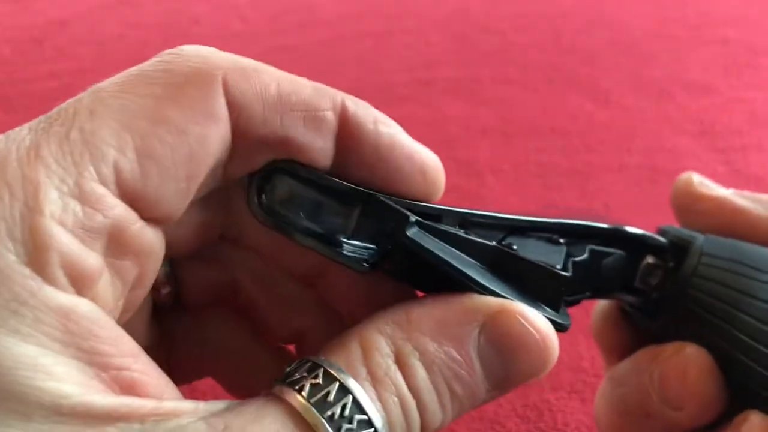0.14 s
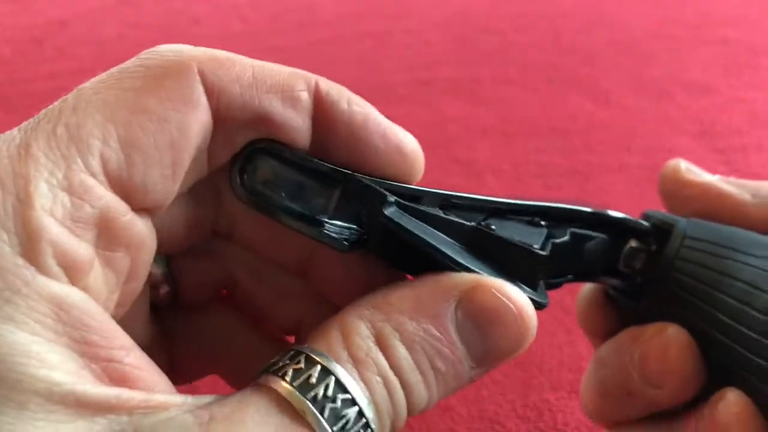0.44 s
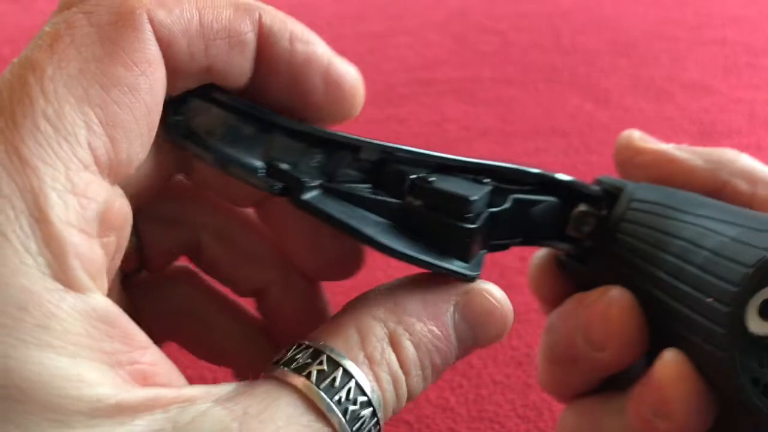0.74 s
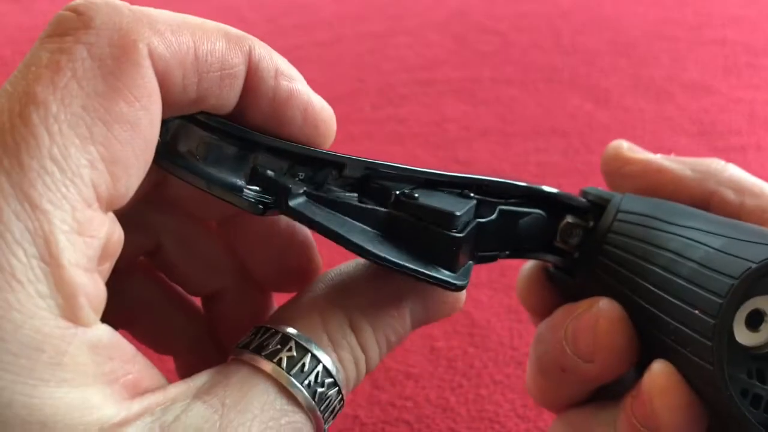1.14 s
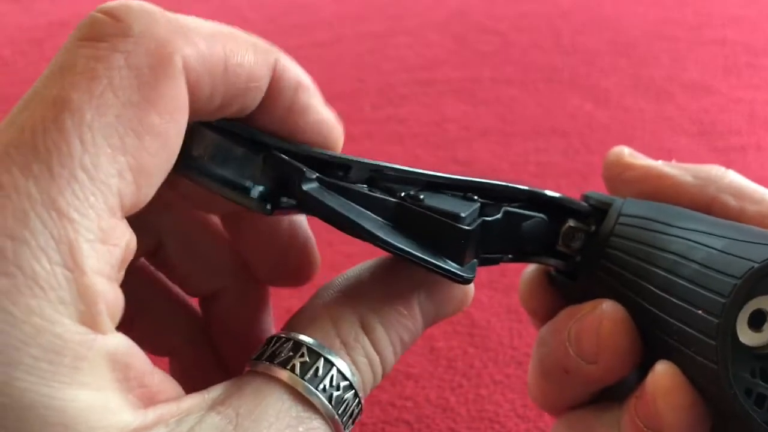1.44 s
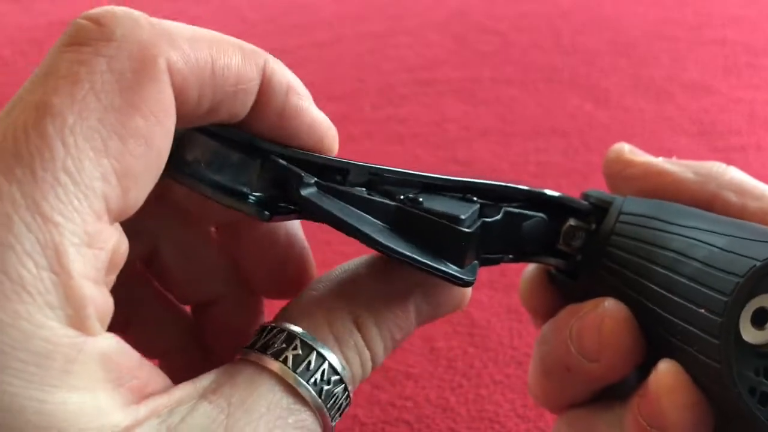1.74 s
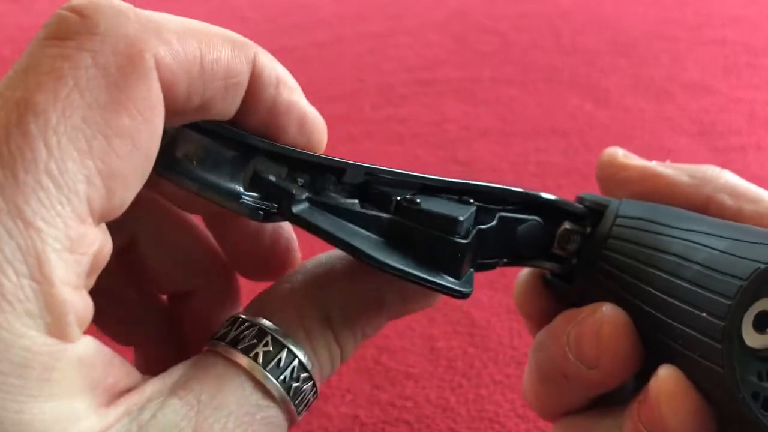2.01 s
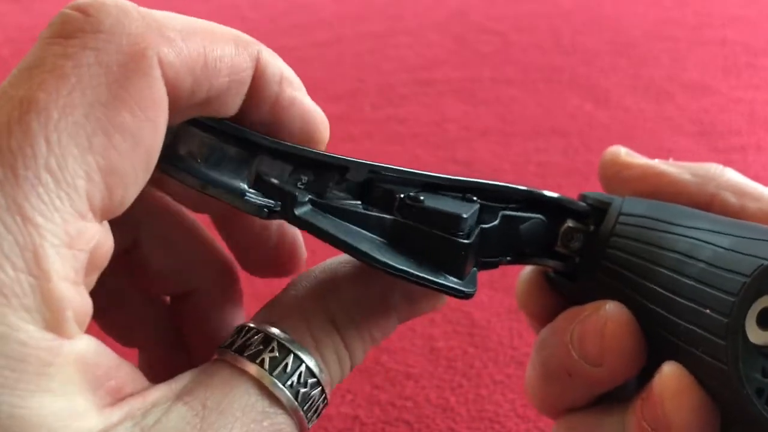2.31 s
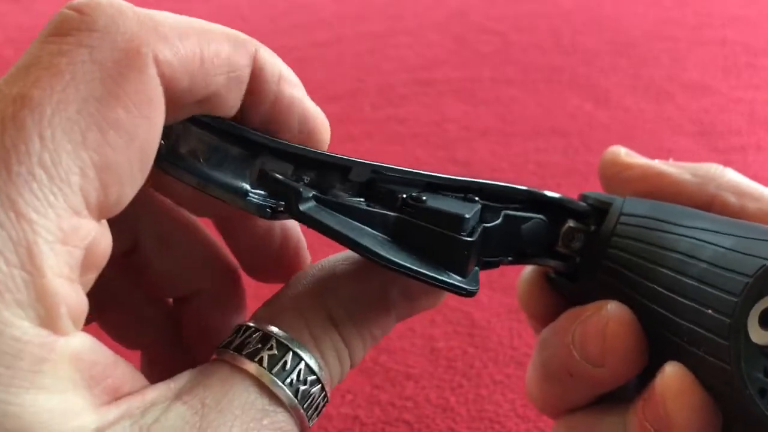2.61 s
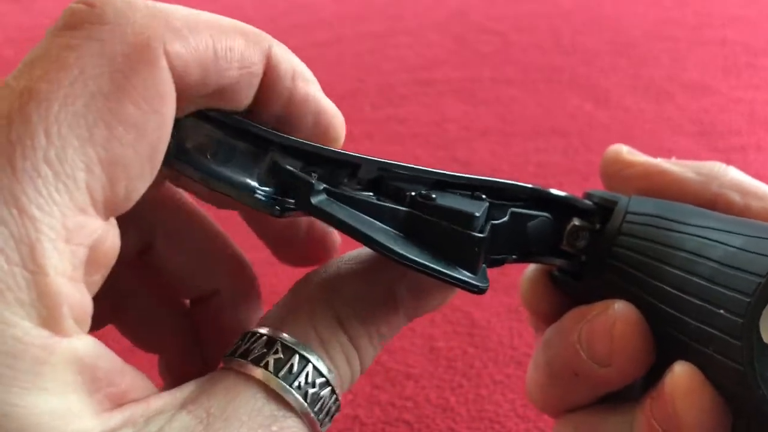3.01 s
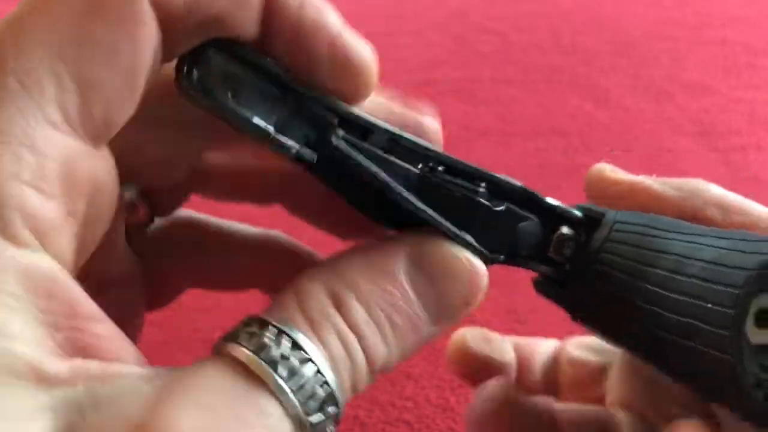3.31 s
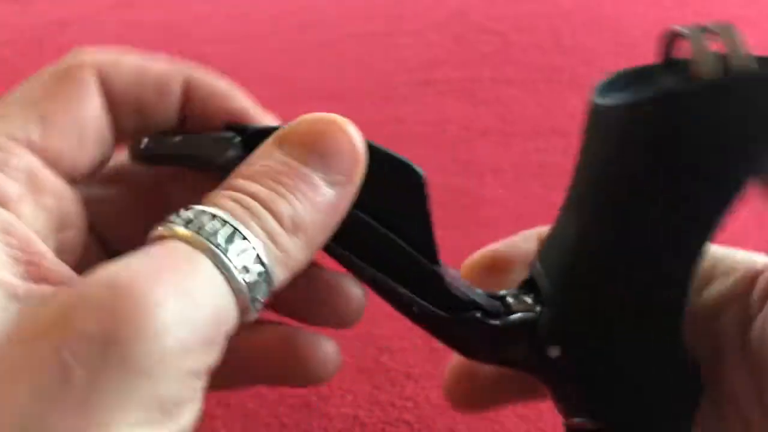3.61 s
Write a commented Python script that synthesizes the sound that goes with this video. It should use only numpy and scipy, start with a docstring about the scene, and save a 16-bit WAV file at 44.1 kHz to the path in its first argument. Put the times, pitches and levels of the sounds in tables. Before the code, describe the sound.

Hard, bright, very short plastic switch clicks, close and dry. The first button snaps down and back twice at 0.19, 0.33, 0.47 and 0.58 s; faint finger rubbing follows. The second clicks ten times from 1.36 to 2.94 s, about every 0.15 s, with a longer gap near 2 s. Around 3.45-3.57 s loose hinge parts clatter with a low soft boom. Quiet room, faint hiss and rumble.

```python
"""Two electronic shift buttons on a hand-held bicycle brake lever are pressed and let go, close by in a quiet room.
Each switch snaps once going down and once coming back: damped modes ring the plastic lever and thump the hand.
Loose hinge parts knock (noise bursts and modes), mostly as the lever is turned over with a low boom at the end.
Fingers tap the paddle (soft-started modes) and slide over the housing (resonant and grainy noise).
Decaying noise and reflections form the room; hiss, rumble, a drone and a hum lie beneath."""
import sys
import numpy as np
from scipy import signal
from scipy.fft import rfft, irfft
from scipy.io import wavfile
from scipy.ndimage import uniform_filter1d, minimum_filter1d

SR = 44100
rng = np.random.default_rng(int(sys.argv[2]) if len(sys.argv) > 2 else 0)


def inscribe(sig):
    """Save sig as 16-bit PCM at rate SR to the path in sys.argv[1].

    A 1-D sig is mono; a 2-D sig holds one channel per row.
    Samples are clipped to [-1, 1] before scaling.
    """
    pcm = np.round(np.clip(np.atleast_2d(sig).T, -1, 1) * 32767)
    wavfile.write(sys.argv[1], SR, pcm.astype(np.int16))


N = 165375
T = np.arange(N) / SR
HIT_T = T[:SR // 8]  # time axis of one struck sound
TILT_PIVOT_HZ = 5500  # a mode here keeps its level under any tilt

# Modes of the lever: f/Hz, T60/s, then relative level/dB for button 1 down, 1 up, 2 down, 2 up
LEVER_MODES = [(1825, 0.011, -60, -28.5, -43.5, -32), (2809, 0.001, -49, -51.5, -80, -54),
               (3356, 0.0086, -34.5, -17, -38.5, -18.5), (4430, 0.0061, -21.5, -6.5, -27, -11.5),
               (5110, 0.0024, -18.5, -23, -28, -10.5), (5750, 0.0095, -28, -22, -26.2, -24.5),
               (6580, 0.0018, -10.6, -32.5, -15, -14), (8440, 0.0026, -17, -28.5, -6, -60),
               (9810, 0.0067, -12.5, -21, -20, -82), (10860, 0.0053, -11.5, -20.5, -36, -42),
               (11960, 0.0045, -16.8, -47, -12, -24.5), (13170, 0.0062, -19, -47, -12.5, -25),
               (13360, 0.0034, -47, -46, -12.5, -37), (14700, 0.0052, -39, -31.5, -11, -48.0)]
# Switch snaps: t/s, relative level/dB, tilt of the modes/(dB per octave), stroke
SNAPS = [(0.1884, 0, 0, "1 down"), (0.3284, 1.5, 1, "1 up"), (.4698, -1.5, 0.5, "1 down"),
         (.5829, 1, 1.5, "1 up"), (1.364, 2, -1, "2 down"), (1.5356, 2, 1.5, "2 up"),
         (1.7129, 2.5, 0.5, "2 down"), (1.854, 2.5, 1, "2 up"), (2.173, 1.5, -1, "2 down"),
         (2.3515, 1, 0.5, "2 up"), (2.5241, 1.6, -0.5, "2 down"), (2.6597, 1, 0, "2 up"),
         (2.7849, 2.4, -2, "2 down"), (2.9397, 1, 0, "2 up")]
# Names of the strokes, in the order of the level columns
STROKES = ["1 down", "1 up", "2 down", "2 up"]
# Spectrum radiated sideways into the room: f/Hz, then gain/dB for button 1 down, 1 up, 2 down, 2 up
SIDE_RADIATION = [(300, -16, -10.5, -29, -18), (1480, 1, 1, -10, 0.5), (2230, -6, 2.5, -3, 2),
                  (3300, 2.5, 10.5, -1, 6.5), (4570, 2.5, 17, 7, 15.5), (5700, 2, 7.5, 6.5, 10.5),
                  (7000, 11, 7.5, 3, -1.5), (8380, 3.5, 4, 2.5, 0), (10200, 7, -2.5, 5, -7),
                  (12400, 1.5, -8, 5.5, -7), (15500, -13.5, -13.5, -2, -27)]
THUMP_HZ, THUMP_T60_S, THUMP_DB, THUMP_DELAY_S = 112, 0.055, -47.5, 0.00096
MODE_SCATTER_DB = 0.4
RADIATES_ABOVE_HZ = 1040


def switches():
    """Modal superposition: a snap excites all lever modes at once, thumps the hand and spills into the room."""
    direct, thump_and_spill = np.zeros(N), np.zeros(N)
    modes, radiation = np.array(LEVER_MODES), np.array(SIDE_RADIATION)
    mode_hz, mode_t60 = modes[:, 0], modes[:, 1]
    for at, db, tilt, stroke in SNAPS:
        k = STROKES.index(stroke)
        mix_db = modes[:, 2 + k] + tilt * np.log2(mode_hz / TILT_PIVOT_HZ)
        scatter_db = MODE_SCATTER_DB * rng.standard_normal(len(modes))
        gains = undb(db + mix_db + scatter_db)
        click = sum(g * ring(hz, t60, np.cos) for g, hz, t60 in zip(gains, mode_hz, mode_t60))
        click[0] /= 2  # halve the sample on the onset step
        add(direct, at, click)
        thump = undb(db + THUMP_DB) * ring(THUMP_HZ, THUMP_T60_S)
        add(thump_and_spill, at + THUMP_DELAY_S, thump)
        spill = undb(db) * coloured(room(), radiation[:, [0, k + 1]])
        add(thump_and_spill, at, spill)
    # the direct snap radiates weakly at low frequencies
    high_pass = signal.butter(2, RADIATES_ABOVE_HZ, "high", fs=SR, output="sos")
    return signal.sosfilt(high_pass, smeared(direct)) + thump_and_spill


SMEAR_HZ, SMEAR_Q = 12500, 1.8


def smeared(x):
    """All-pass dispersion: spreads a snap's treble over a fraction of a millisecond, which lowers its peak."""
    b, a = signal.iirpeak(SMEAR_HZ, SMEAR_Q, fs=SR)
    return x - 2 * signal.lfilter(b, a, x)


# Knocks of loose hinge parts: t/s, level/dB, tilt/(dB per octave), hinge ring level relative to the knock/dB
KNOCKS = [(1.041, -58.5, -1, -10), (2.4424, -37.5, 3, -22), (3.1984, -35.5, 1, -6), (3.45, -31.5, 3, -23),
          (3.458, -48, 3, -14), (3.509, -39, -4.5, 0), (3.5204, -17.5, -1, 1), (3.527, -31.5, 2.5, -9),
          (3.5315, -28, -4.5, -0.5), (3.539, -31.5, 0.5, -1), (3.572, -45, 6, 6)]
# Spectrum of the crack: f/Hz, relative level/dB
KNOCK_COLOUR = [(45, -8), (75, -3), (140, -15), (400, -8), (900, 0), (1700, 2.5), (3000, 0.5), (5000, 4.5),
                (9000, 5.5), (16000, -6)]
# Modes of the hinge and its spring: f/Hz, T60/s, relative level/dB
HINGE_MODES = [(1790, .014, -11), (2520, .018, -9), (3230, .035, -13), (5550, .02, -20), (6900, .02, -19),
               (8150, .02, -19), (9400, .015, -18), (11450, .02, -17), (14500, .01, -14)]
KNOCK_T60_S, KNOCK_TAIL_T60_S, KNOCK_TAIL_DB = 0.0069, 0.072, -22
KNOCK_SCATTER_DB = 1.5


def knocks():
    """Impact excitation: loose parts meet with a short crack and a rattling tail, and ring the hinge's modes."""
    out = np.zeros(N)
    tail = undb(KNOCK_TAIL_DB) * fade(HIT_T, KNOCK_TAIL_T60_S)
    envelope = fade(HIT_T, KNOCK_T60_S) + tail
    for at, db, tilt, ring_db in KNOCKS:
        crack = noise(KNOCK_COLOUR, size=len(HIT_T), tilt=tilt) * envelope
        rings = np.zeros(len(HIT_T))
        for hz, t60, mode_db in HINGE_MODES:
            polarity = rng.choice([-1, 1])
            scatter_db = KNOCK_SCATTER_DB * rng.standard_normal()
            gain = undb(mode_db + tilt * np.log2(hz / TILT_PIVOT_HZ) + scatter_db)
            rings += polarity * gain * ring(hz, t60)
        add(out, at, undb(db) * (crack + undb(ring_db) * rings))
    return out


# Finger taps on the paddle: t/s, hollow ring level/dB, thud level/dB
TAPS = [(0.1913, -32.5, -39.5), (0.472, -32, -42), (.627, -39, -37), (0.67, -35.5, -60), (3.39, -41, -67.5),
        (3.406, -50, -68), (3.523, -35, -40), (3.738, -43, -54)]
# Modes of the hollow ring: f/Hz, T60/s, relative level/dB
TAP_MODES = [(1150, .01, -9), (1620, .02, -1), (1900, .014, -7)]
THUD_HZ, THUD_T60_S = 220, 0.018
TAP_ATTACK_S = 0.0015  # time constant


def taps():
    """Soft contact: a gradual onset dulls the hollow ring of the paddle, beside a low damped thud."""
    out = np.zeros(N)
    attack = 1 - np.exp(-HIT_T / TAP_ATTACK_S)
    hollow = sum(undb(db) * ring(hz, t60) for hz, t60, db in TAP_MODES) * attack
    thud = ring(THUD_HZ, THUD_T60_S)
    for at, ring_db, thud_db in TAPS:
        add(out, at, undb(ring_db) * hollow + undb(thud_db) * thud)
    return out


BUMP_S, BUMP_HZ, BUMP_T60_S, BUMP_DB = 3.523, 61.4, 0.22, -42.5


def bump():
    """Damped oscillation: turning the lever over jolts it once, with a low boom."""
    out = np.zeros(N)
    add(out, BUMP_S, undb(BUMP_DB) * ring(BUMP_HZ, BUMP_T60_S))
    return out


# Skin sliding on the housing: middle t/s, Gaussian half length/s, level/dB, power share of dry scraping (0-1)
SLIDES = [(.01, 0.032, -56.5, 0.3), (0.804, 0.042, -61.5, 0.23), (0.94, 0.021, -66, 0.1),
          (1.114, 0.017, -60.5, 0.25), (3.17, 0.033, -66, .7), (3.217, 0.041, -57.5, 0.34),
          (3.387, 0.02, -59, 0), (3.453, 0.018, -48.5, 0.74), (3.532, 0.022, -49.5, 0.66),
          (3.708, 0.022, -57, 1)]
# Resonances of the swish: f/Hz, width of one filter pass/Hz, relative level/dB
SLIDE_RESONANCES = [(1790, 340, -12.5), (4030, 1700, -3), (8860, 790, -8)]
# Spectrum of the scrape: f/Hz, relative level/dB
SCRAPE_COLOUR = [(500, -32), (2000, 1), (6000, 4.5), (12000, -0.5), (16000, 0)]
SCRAPE_GRAIN_DB, SCRAPE_GRAIN_S = 2, 0.0026  # rms level swing, smoothing time


def slides():
    """Friction noise: sliding skin swells and fades, as a smooth resonant swish or a grainy scrape."""
    swish = unit(sum(undb(db) * resonant_noise(hz, width) for hz, width, db in SLIDE_RESONANCES))
    grain = unit(uniform_filter1d(rng.standard_normal(N), int(SCRAPE_GRAIN_S * SR)))
    scrape = unit(noise(SCRAPE_COLOUR) * undb(SCRAPE_GRAIN_DB * grain))
    out = np.zeros(N)
    for at, half, db, share in SLIDES:
        swell = np.exp(-0.5 * ((T - at) / half) ** 2)
        friction = np.sqrt(1 - share) * swish + np.sqrt(share) * scrape
        out += undb(db) * swell * friction
    return out


# Reflections from near surfaces: delay t/s, level/dB
REFLECTIONS = [(.0087, -44), (.0112, -40), (.0165, -34), (.0222, -46)]
ROOM_DELAY_S = 0.007
ROOM_DB, ROOM_T60_S = -25, 0.31  # energy level before colouring, decay
EARLY_DB, EARLY_T60_S = -27.5, 0.06


def room():
    """Impulse response: near reflections, quick scatter from hands and table, and a faint short tail."""
    t = T[:SR // 2]
    tail = unit(rng.standard_normal(len(t)) * fade(t, ROOM_T60_S))
    early = unit(rng.standard_normal(len(t)) * fade(t, EARLY_T60_S))
    diffuse = undb(ROOM_DB) * tail + undb(EARLY_DB) * early
    response = np.zeros(N)
    add(response, ROOM_DELAY_S, diffuse / np.sqrt(len(t)))  # from unit power to unit energy
    for delay, db in REFLECTIONS:
        add(response, delay, undb([db]))
    return response[:len(t)]


# Spectrum of the hiss: f/Hz, relative level/dB
HISS_COLOUR = [(200, -19.5), (400, -3.5), (1000, -5), (2000, -8), (4000, -7.5), (8000, -13), (10500, -14),
               (13000, -12), (16000, -19)]
# Spectrum of the room rumble: f/Hz, relative level/dB
RUMBLE_COLOUR = [(20, -19), (40, -2.5), (70, -4.5), (105, 0.5), (190, -5.5), (280, -3.5), (450, -17.5),
                 (1000, -42.5)]
# Course of the low drone: t/s, rms level/dB
DRONE_LEVEL = [(0, -69), (.15, -61.5), (.7, -63.5), (.85, -57.5), (1.25, -60.5), (1.6, -65.5), (3.75, -82)]
HISS_DB, RUMBLE_DB = -63, -62.5
HISS_DIP_START_S, HISS_DIP_END_S, HISS_DIP_DB = 1, 1.35, -8.5
DRONE_HZ, DRONE_WAVER_HZ, WAVER_S = 47.3, 3, 0.17  # mean, rms waver, smoothing time
HUM_HZ, HUM_WIDTH_HZ, HUM_DB = 250.8, 4.3, -74  # width of one filter pass


def background():
    """Continuous noise and tones: hiss that dips briefly, rumble, a frequency-modulated drone and a thin hum."""
    in_dip = (T > HISS_DIP_START_S) & (T < HISS_DIP_END_S)
    dip = uniform_filter1d(in_dip.astype(float), size=400)  # soft edges
    hiss = undb(HISS_DB + HISS_DIP_DB * dip) * noise(HISS_COLOUR)
    rumble = undb(RUMBLE_DB) * noise(RUMBLE_COLOUR)
    waver = unit(uniform_filter1d(rng.standard_normal(N), int(WAVER_S * SR)))
    phase = 2 * np.pi * np.cumsum(DRONE_HZ + DRONE_WAVER_HZ * waver) / SR
    drone_db = np.interp(T, *np.array(DRONE_LEVEL).T)
    drone = undb(drone_db) * unit(np.sin(phase))
    hum = undb(HUM_DB) * resonant_noise(HUM_HZ, HUM_WIDTH_HZ)
    return hiss + rumble + drone + hum


def undb(db):
    """Amplitude ratio: decibels to gain."""
    return 10 ** (np.asarray(db) / 20)


def unit(x):
    """Power normalisation: scale to rms 1."""
    return x / np.sqrt(np.mean(x ** 2))


def fade(t, t60):
    """Exponential decay: 60 dB down after t60."""
    return np.exp(-np.log(1000) * t / max(t60, 1e-4))


def ring(hz, t60, wave=np.sin):
    """Damped harmonic oscillator: one struck mode."""
    return wave(2 * np.pi * hz * HIT_T) * fade(HIT_T, t60)


def add(out, at, x):
    """Linear superposition: mix x into out from time at (s) on."""
    i = max(int(round(at * SR)), 0)
    out[i:i + len(x)] += x[:max(N - i, 0)]


def noise(colour, size=N, tilt=0):
    """Spectral shaping of white noise: coloured noise of rms 1."""
    return unit(coloured(rng.standard_normal(size), colour, tilt))


def resonant_noise(hz, width):
    """Resonance: white noise passed twice through one peak, for steep sides, at rms 1."""
    b, a = signal.iirpeak(hz, hz / width, fs=SR)
    once = signal.lfilter(b, a, rng.standard_normal(N))
    return unit(signal.lfilter(b, a, once))


TILT_FROM_HZ = 900


def coloured(x, colour, tilt=0):
    """Linear filtering by a spectrum of (f/Hz, gain/dB) points, tilted in dB per octave above a corner."""
    octave = np.log2(np.maximum(np.fft.rfftfreq(len(x), 1 / SR), 1))
    hz, db = np.array(colour, float).T
    tilt_db = tilt * np.maximum(octave - np.log2(TILT_FROM_HZ), 0)
    gain = undb(np.interp(octave, np.log2(hz), db) + tilt_db)
    return irfft(rfft(x) * gain, len(x))


# Spectrum of the room's answer to the handling noises: f/Hz, gain/dB
ROOM_COLOUR = [(200, 7), (1500, 6.5), (4800, 5.5), (16000, -4)]


def scene():
    """Superposition of the switches, the handling noises convolved with their room, and the background."""
    handling = knocks() + taps() + bump() + slides()
    echo = signal.fftconvolve(handling, coloured(room(), ROOM_COLOUR))[:N]
    return (switches() + handling + echo + background())[None]


TOP_HZ = 16250
LIMIT, LIMIT_WINDOW_S = 0.98, 0.006  # full scale is 1


def record(dry):
    """Peak limiting and band limiting: smoothed gain dips tame the tallest peaks, a low-pass cuts the top."""
    low_pass = signal.ellip(8, 0.2, 70, TOP_HZ, fs=SR, output="sos")
    size = int(LIMIT_WINDOW_S * SR)
    peaks = np.abs(signal.sosfilt(low_pass, dry))
    gain = LIMIT / np.maximum(peaks, LIMIT)
    smooth_gain = uniform_filter1d(minimum_filter1d(gain, size), size)
    return signal.sosfilt(low_pass, dry * smooth_gain)


dry = scene()
out = record(dry)
inscribe(out)
```